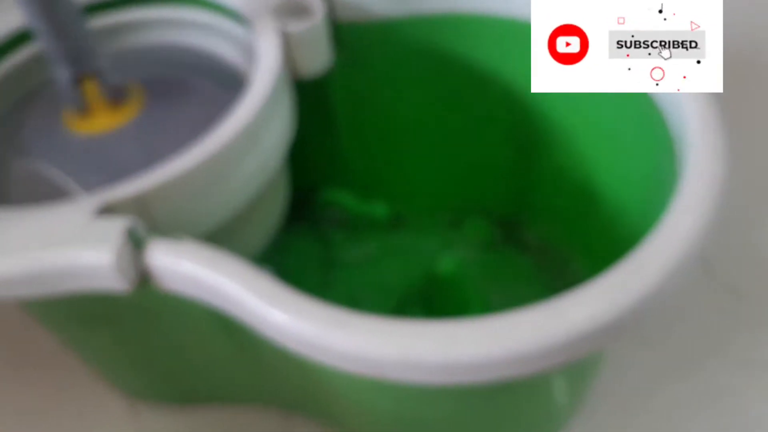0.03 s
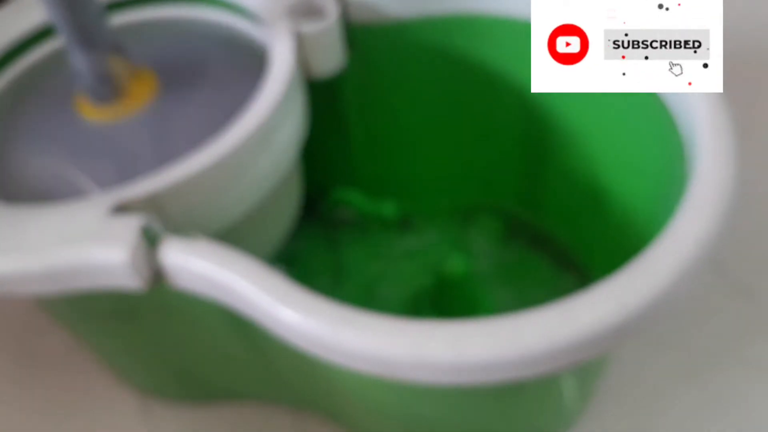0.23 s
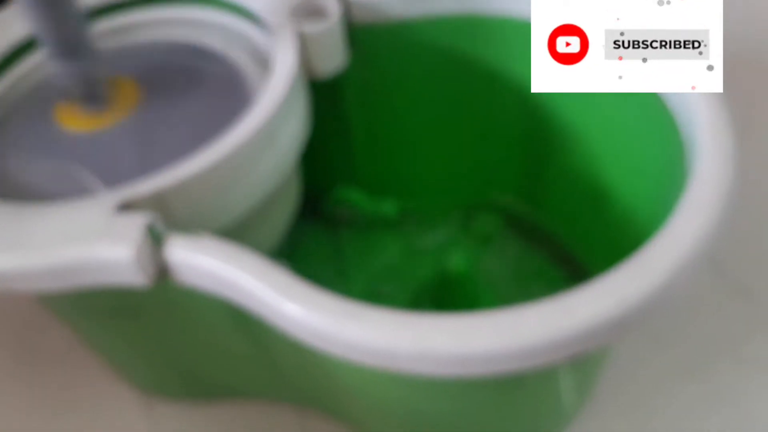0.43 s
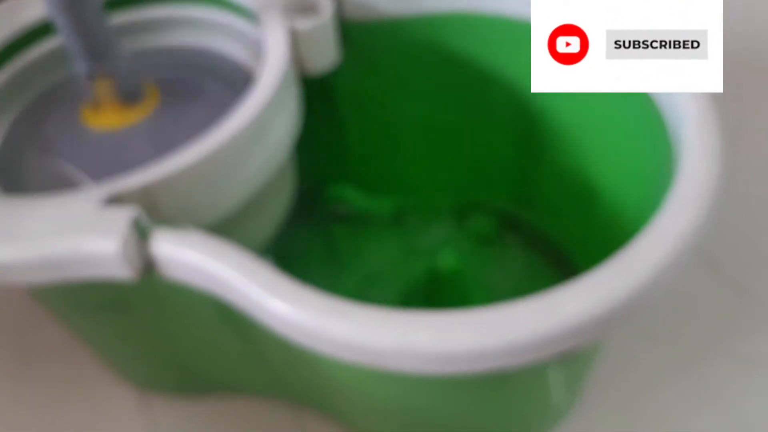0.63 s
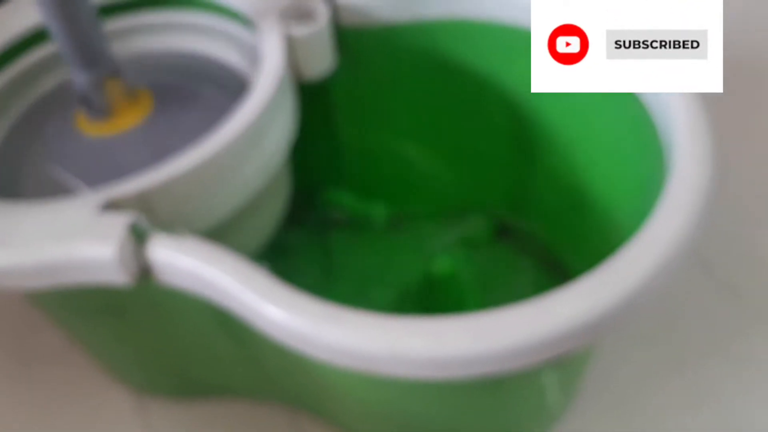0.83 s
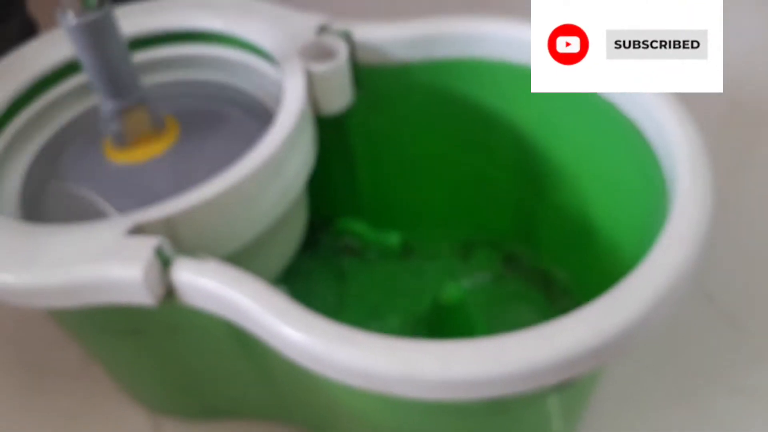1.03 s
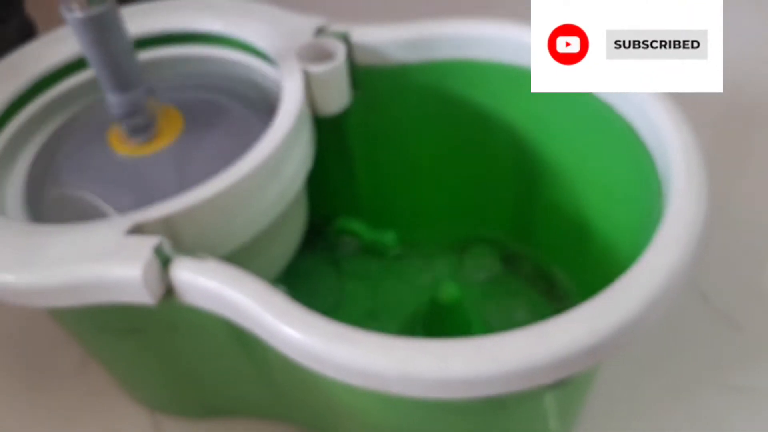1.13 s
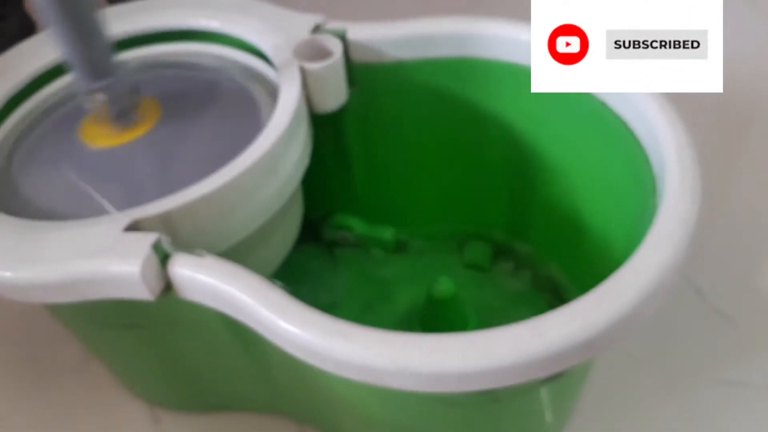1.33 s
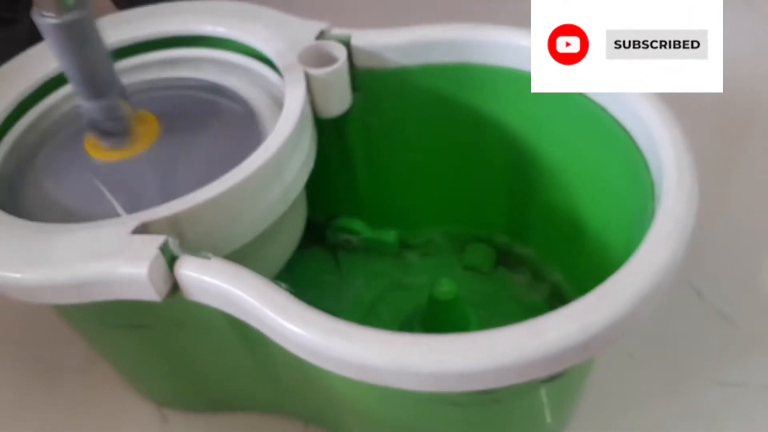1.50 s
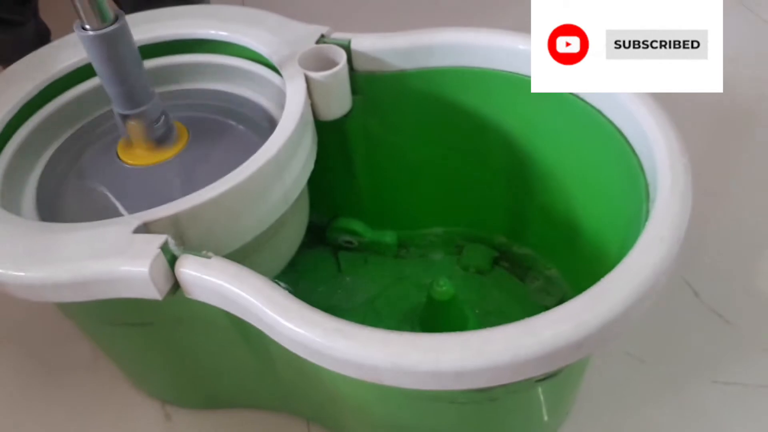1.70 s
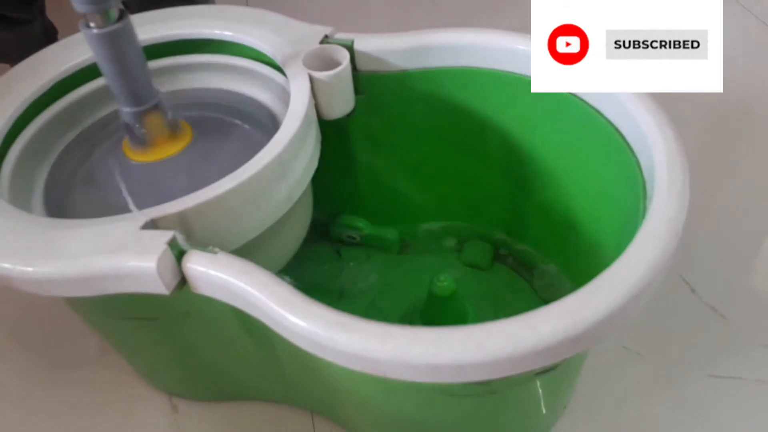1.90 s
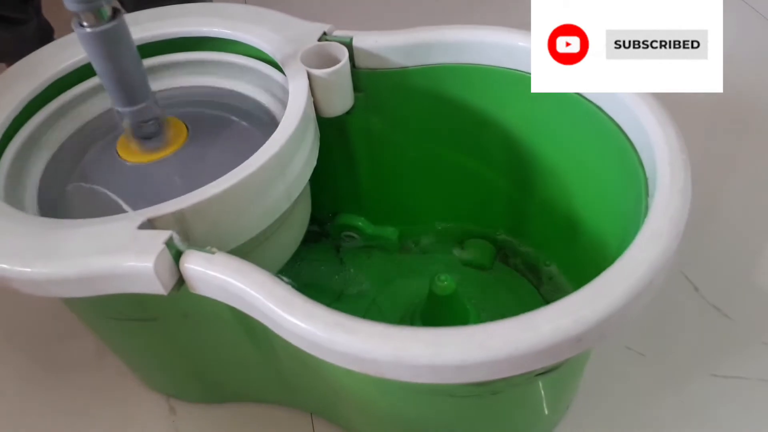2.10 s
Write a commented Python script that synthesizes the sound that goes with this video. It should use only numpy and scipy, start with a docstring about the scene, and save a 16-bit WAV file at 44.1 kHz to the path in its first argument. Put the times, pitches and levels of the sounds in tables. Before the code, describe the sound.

Hollow thumps and whirling swishes come from a wet mop spun in a plastic bucket's basket, close by in a small, hard-walled room. Two strokes each bring a sliding rasp, sharp clicks and light spray over a faint rumble.

```python
"""In a small hard-walled room, a spin mop is pumped twice in the basket of a plastic bucket.
The handle slides up with a rasp and hits its stop; on the way down the drive catches with a click,
the basket thumps the bucket and whirls, and the wet strands swish and throw fine spray.
Impacts excite the bucket's damped modes; friction and droplets are random impulses, coloured by the
resonances of basket and tube."""
import sys
import numpy as np
from scipy import signal
from scipy.fft import rfft, irfft, next_fast_len
from scipy.io import wavfile
from scipy.ndimage import uniform_filter1d

SR = 44100
rng = np.random.default_rng(int(sys.argv[2]) if len(sys.argv) > 2 else 0)


def persist_wave(psi):
    """Save psi, clipped to +-1, as 16-bit WAV."""
    counts = np.round(np.clip(psi, -1, 1) * 32767).astype(np.int16)
    wavfile.write(sys.argv[1], SR, np.atleast_2d(counts).T)


N = 94815

# resonances of the basket and handle tube (f/Hz, width/Hz, boost/dB)
BASKET_RESONANCES = [(623.4, 18, 6), (940, 35, 5), (1153, 91, 4.5), (1380, 45, 0.5), (1869, 43, 4),
                     (2035, 17, 7), (2247, 84, 4.5), (4020, 67, 2.5), (5140, 40, 2.5), (5560, 21, -0.5),
                     (6200, 14, 2)]


def undb(db):
    """Amplitude ratio of a level in decibels."""
    return 10 ** (np.asarray(db) / 20)


def unit(x):
    """Normalisation to rms 1."""
    return x / np.sqrt(np.mean(x ** 2))


def on_log(hz, points):
    """Interpolation of (f/Hz, level/dB) points on a log-frequency axis."""
    f, db = np.array(points, float).T
    return np.interp(np.log(hz + 1), np.log(f), db)


def shape(x, points, peaks=()):
    """Minimum-phase filter of unit power gain: (f/Hz, level/dB) points plus resonance peaks."""
    half = next_fast_len(len(x))
    hz = np.fft.rfftfreq(2 * half, 1 / SR)
    peaks_db = sum(boost / (1 + (2 * (hz - f) / width) ** 2) for f, width, boost in peaks)
    cepstrum = irfft(np.log(unit(undb(on_log(hz, points) + peaks_db))))
    cepstrum[1:half] *= 2  # folding the cepstrum makes the filter causal
    cepstrum[half + 1:] = 0
    return irfft(rfft(x, 2 * half) * np.exp(rfft(cepstrum)))[:len(x)]


def noise(points):
    """Filtered Gaussian noise of rms 1."""
    return unit(shape(rng.standard_normal(N), points))


def walk(rate):
    """Smooth random fluctuation of rms 1, changing about rate times a second."""
    width = max(int(SR / rate), 2)
    smoothed = uniform_filter1d(rng.standard_normal(N), width, mode="wrap")
    return unit(uniform_filter1d(smoothed, width, mode="wrap"))


def fade(t, t60):
    """Exponential decay by 60 dB in t60 seconds."""
    return np.exp(-np.log(1000) * t / t60)


def add(out, start, x):
    """Superposition of x on out from a start time in seconds."""
    i = int(start * SR)
    out[i:i + len(x)] += x[:N - i]


def swell(t, rows):
    """Asymmetric Gaussian envelopes, summed in power."""
    bells = (undb(db) * np.exp(-((t - at) / np.where(t < at, rise, fall)) ** 2 / 2)
             for at, rise, fall, db in rows)
    return np.sqrt(sum(bell ** 2 for bell in bells) + 1e-18)


def shot_noise(t, swells, spectrum, per_s=1800, impulse_share=0.45):
    """Shot noise: tiny slips or droplets over a hiss, fluttering and swelling with each stroke."""
    impulses = (rng.random(N) < per_s / SR) * rng.choice([-1, 1], N)
    impulses = impulses * undb(2 * np.minimum(rng.exponential(size=N), 5))  # sizes span 10 dB
    force = np.sqrt(impulse_share) * unit(impulses) + np.sqrt(1 - impulse_share) * rng.standard_normal(N)
    flutter = undb(1.69 * walk(99))
    return unit(shape(force, spectrum, BASKET_RESONANCES)) * flutter * swell(t, swells)


def background():
    """Broadband noise: the room's low rumble, its level drifting slightly."""
    spectrum = [(15, -58), (30, -26), (60, -15), (150, -7.5), (230, -1), (305, 2.5), (380, -4.5),
                (500, -7.5), (650, -12.5), (900, -16), (1250, -7), (1550, -19), (2100, -14), (3400, -25.5),
                (6000, -30.5), (9000, -38), (15500, -48.5)]  # rumble (f/Hz, relative level/dB)
    return undb(-39.5 + 0.2 * walk(2.5)) * noise(spectrum)


def room(x, t):
    """Reverberation: the hard walls add a diffuse, exponentially decaying tail to the direct sound."""
    tail = noise([(100, -13.5), (4000, -8), (15000, -21)]) * fade(t, t60=0.74) * (1 - np.exp(-t / 0.0027))
    return x + undb(-15) * signal.fftconvolve(x, tail / np.sqrt(np.sum(tail ** 2)))[:N]


def water(t):
    """Droplet noise: spray strikes the wall, the finest mist lands last, shifting wet strands crackle."""
    # swells of each (peak t/s, rise/s, fall/s, level/dB)
    sprays = [(.785, 0.042, 0.03, -40.5), (1.88, 0.032, .06, -46)]
    mists = [(0.832, .025, 0.03, -49.5), (1.894, 0.037, .05, -65)]
    crackles = [(.11, 0.094, 0.033, -52), (.245, 0.024, 0.033, -42.5), (.42, .035, .04, -46.5),
                (.58, 0.026, 0.06, -43), (1.02, 0.097, .03, -50.5), (1.22, 0.12, 0.15, -54),
                (1.56, 0.04, 0.045, -42), (1.685, .012, 0.052, -43.5), (2.07, 0.065, 0.077, -50.5)]
    # their spectra (f/Hz, relative level/dB)
    spray_spectrum = [(1500, 2), (4000, -14), (7500, -6.5), (10000, -10), (15000, -18)]
    mist_spectrum = [(1000, -38), (7000, -14), (11500, 6), (14000, 3), (15500, -1)]
    crackle_spectrum = [(200, -37), (2000, 6), (4500, 2), (7500, -3.5), (10500, -12.5), (15000, -19)]
    droplets = shot_noise(t, sprays, spray_spectrum) + shot_noise(t, mists, mist_spectrum)
    return droplets + shot_noise(t, crackles, crackle_spectrum, per_s=500, impulse_share=0.74)


def friction(t):
    """Sliding friction: the handle rises, the basket whirls and the drive rasps under load."""
    # swells of each (peak t/s, rise/s, fall/s, level/dB)
    slides = [(0.133, 0.056, 0.12, -35.5), (1.184, 0.075, 0.086, -34.5)]
    whirls = [(0.533, 0.059, 0.039, -28), (.775, 0.079, .085, -29), (1.6, 0.12, 0.21, -35.5),
              (1.875, 0.047, 0.046, -26), (1.961, 0.072, .09, -35.5)]
    rasps = [(.235, 0.035, 0.042, -54), (0.505, 0.026, 0.039, -37), (1.56, 0.042, 0.064, -50.5),
             (1.69, 0.016, 0.1, -63)]
    # their spectra (f/Hz, relative level/dB)
    slide_spectrum = [(30, -45), (500, -2.5), (850, 4.5), (1150, -3.5), (1400, 9.5), (1650, -4),
                      (2050, 3.5), (3000, -1.5), (4500, -3), (6500, -12.5), (9000, -23), (15000, -34)]
    whirl_spectrum = [(30, -61), (140, -27.5), (300, 16.5), (450, 3), (620, 5), (1100, 3), (1600, 0.5),
                      (2000, 0.5), (3000, -7.5), (5500, -12.5), (8500, -19.5), (15000, -31.5)]
    rasp_spectrum = [(800, -71), (2600, 8), (4100, 6), (6200, 7), (7500, -8), (10000, -22), (15000, -69)]
    return (shot_noise(t, slides, slide_spectrum) + shot_noise(t, whirls, whirl_spectrum)
            + shot_noise(t, rasps, rasp_spectrum))


def bucket_hum(t):
    """Forced vibration: the mop's uneven rubbing keeps the bucket's main mode sounding, with a flutter."""
    swells = [(.13, 0.083, 0.11, -38), (1.085, 0.018, 0.03, -29.5), (1.17, 0.015, 0.023, -29),
              (1.36, 0.017, 0.12, -31), (2.03, 0.3, .12, -41)]  # spells of humming (peak t/s, rise/s, fall/s, level/dB)
    mode_hz, waver_hz, roughness = 301, 2.18, 0.22
    phase = 2 * np.pi * np.cumsum(mode_hz + waver_hz * walk(48)) / SR
    in_phase = np.sin(phase) * (1 + roughness * walk(81))
    quadrature = roughness * walk(100) * np.cos(phase)
    return unit(in_phase + quadrature) * swell(t, swells)


def drive_clicks(t):
    """Impulse excitation: the drive snaps sharply and the handle tube rings briefly."""
    clicks = [(0.221, -26.5, 0), (0.3411, -34.5, -12), (0.374, -39, -8), (0.4626, -27, -3),
              (0.465, -18, -2), (0.4678, -29.5, -2), (0.48, -30, 4), (0.575, -38.5, 6), (1.036, -43, 2),
              (1.2554, -45, -1), (1.4688, -34.5, -12), (1.5094, -35, -18), (1.567, -31, -6),
              (1.672, -39.5, 6)]  # snaps (t/s, level/dB, tilt/(dB per octave))
    spectrum = [(1000, -37), (2800, -13), (4000, 0.5), (4600, 4.5), (5050, -1), (5550, 7), (6300, 0),
                (7500, -3), (10000, -16), (15000, -40)]  # a snap before its tilt (f/Hz, relative level/dB)
    out, t = np.zeros(N), t[:SR // 2]
    envelope = np.exp(-t / 0.0028) + undb(-13) * fade(t, t60=0.14)  # snap, then ring
    for start, db, tilt in clicks:
        tilted = [(hz, level + tilt * np.log2(hz)) for hz, level in spectrum]
        burst = envelope * rng.standard_normal(len(t))
        add(out, start, undb(db) * shape(burst, tilted, BASKET_RESONANCES))
    return signal.sosfilt(signal.butter(2, 1500, "high", fs=SR, output="sos"), out)


def bucket_thumps(t):
    """Modal response: each blow cracks and excites the bucket's damped modes; walls and room ring on."""
    blows = [(0.2091, -11.5, -8, -19.5, -17, -39), (0.4887, -9, -7.5, -5, -15, -18.5),
             (.502, -22.5, -10, -27, -26, -19), (0.589, -20.5, -14, -49, -57, -42),
             (0.7487, -15.5, -14.5, -20.5, -25, -26.5), (1.267, -16.5, -9, -28, -15, -24.5),
             (1.298, -18, -17.5, -21, -35, -30), (1.5443, -10, -21, -2, -28.5, -16),
             (1.622, -18, -17.5, -16, -22.5, -29), (1.645, -16, -23, -41, -47, -44),
             (1.8253, -13, -12, -33, -32, -28), (2.092, -35, -35, -36, -26, -36)]  # blows on the bucket (t/s, then level/dB of boom, ring, knock, clatter, rim)
    bands = [232, 295, 450, 900, 1400]  # centres of those five bands (f/Hz)
    modes = [(140.8, -26, 0.52), (195, -21, 0.47), (233.1, -2, 0.28), (292, -34, 0.12), (302.86, -3, 0.37),
             (338.8, -8.5, 0.27), (398.4, -13.5, 0.084), (479, -18.5, 0.14), (623, -16.5, 0.14),
             (796, -18.5, 0.3), (909, -17, 0.11), (1108, -14, 0.11), (1383, -9.5, 0.12), (1878, -21, 0.11)]  # bucket modes (f/Hz, relative level/dB, t60/s)
    wall_spectrum = [(25, -58), (60, -66.5), (110, -8.5), (190, 1.5), (300, 3), (480, -6), (700, -12.5),
                     (1400, -9), (2600, -23), (6000, -60), (15000, -63)]  # dense ringing of walls and room (f/Hz, relative level/dB)
    wall_peaks = [(247, 30, 4), (302.5, 8.5, 4), (476, 33, 4), (1400, 240, 5)]  # bucket resonances colouring it (f/Hz, width/Hz, boost/dB)
    soft_hz, soft_db = 2640, -10  # the padded mop dulls every blow's treble
    drop_s, fall_s, drop_to = 0.0234, 0.0017, 0.6  # each ring peaks, then drops quickly after about 23 ms
    contact_db, cutoff_hz = 10.5, 135  # the bucket is too small to radiate well below the cutoff
    out, t = np.zeros(N), t[:SR]
    build_up = 1 - 0.65 * np.exp(-t / 0.012)
    drop = drop_to + (1 - drop_to) * (1 - np.tanh((t - drop_s) / fall_s)) / 2
    crack = undb(-7) * np.exp(-t / 0.006)
    wall_ring = undb(-10) * (1 - np.exp(-t / 0.002)) * fade(t, t60=0.96)
    grid_hz = np.geomspace(25, SR / 2, num=120)
    wall_db = on_log(grid_hz, wall_spectrum)
    for start, *levels in blows:
        spectrum = list(zip(bands, levels)) + [(soft_hz, np.mean(levels) + soft_db)]
        detune = 1 + 0.0034 * rng.standard_normal(len(modes))
        ring = sum(undb(db + on_log(hz, spectrum)) * np.sin(2 * np.pi * hz * detune[k] * t) * fade(t, t60)
                   for k, (hz, db, t60) in enumerate(modes))
        force = (crack + wall_ring) * rng.standard_normal(len(t))
        force[0] += undb(contact_db)
        blow_db = on_log(grid_hz, spectrum)
        # rms strength of the blow over the frequencies at which the walls ring
        gain = np.sqrt(np.average(undb(blow_db) ** 2, weights=grid_hz * undb(wall_db) ** 2))
        walls = gain * shape(force, list(zip(grid_hz, wall_db + blow_db)), wall_peaks)
        add(out, start, 2 * build_up * drop * ring + walls)
    return signal.sosfilt(signal.butter(3, cutoff_hz, "high", fs=SR, output="sos"), out)


def scene():
    """Superposition of bucket, drive, friction and water over the room's low rumble."""
    t = np.arange(N) / SR
    swish = friction(t) + water(t)
    rumble = background()
    bucket = bucket_thumps(t) + bucket_hum(t)
    return (rumble + room(drive_clicks(t) + swish, t) + bucket)[None]


def record(dry):
    """Band limiting: a steep low-pass removes the treble above 15750 Hz."""
    return signal.sosfilt(signal.ellip(10, .2, 80, 15750, fs=SR, output="sos"), dry)


dry = scene()
out = record(dry)
persist_wave(out)
```